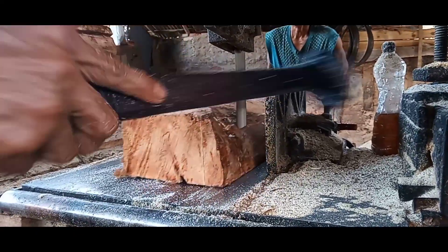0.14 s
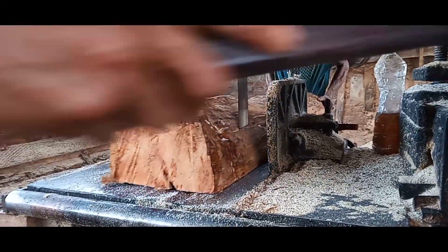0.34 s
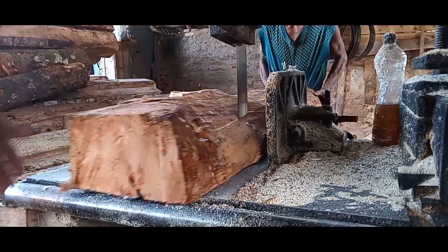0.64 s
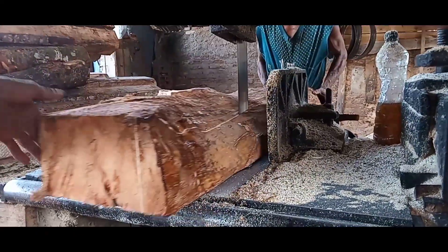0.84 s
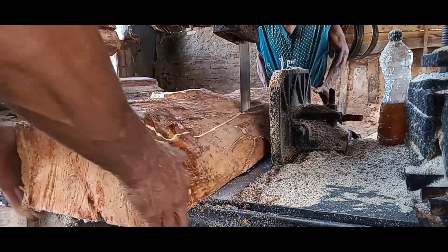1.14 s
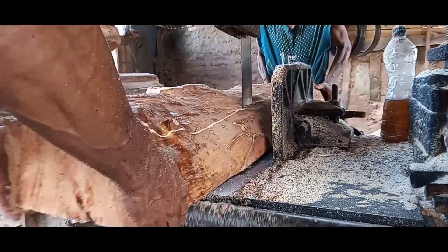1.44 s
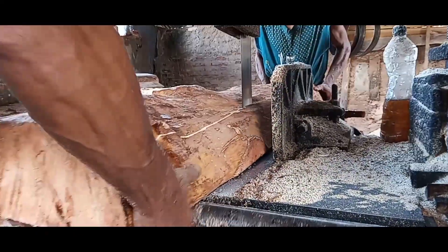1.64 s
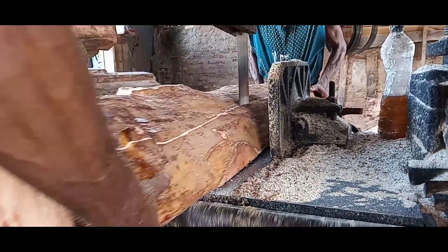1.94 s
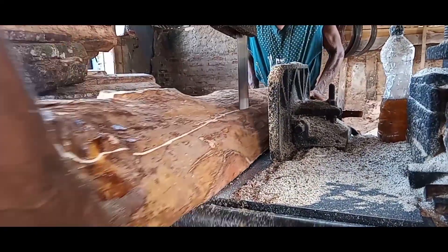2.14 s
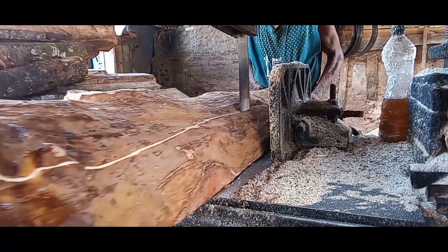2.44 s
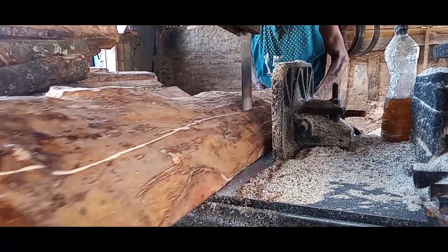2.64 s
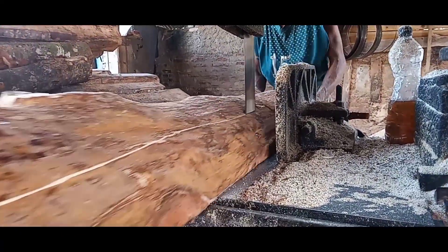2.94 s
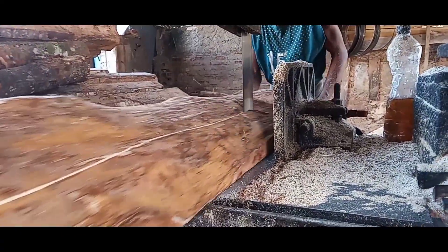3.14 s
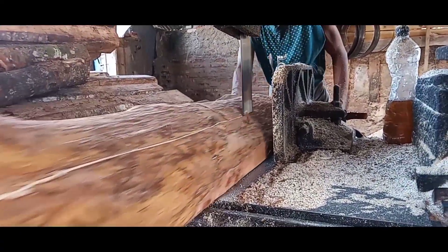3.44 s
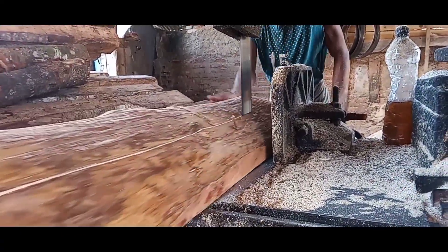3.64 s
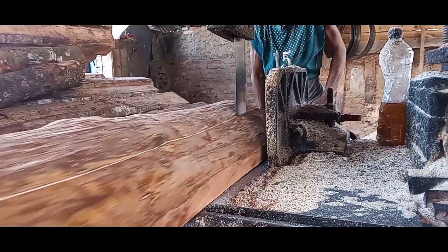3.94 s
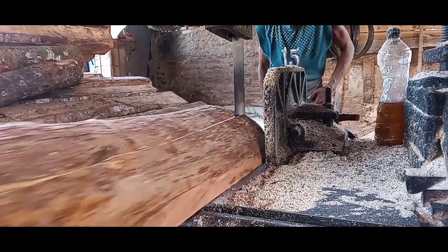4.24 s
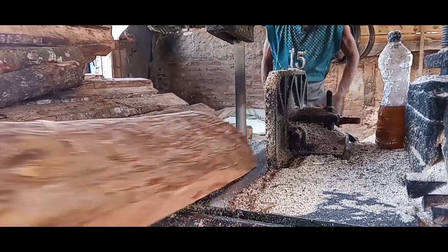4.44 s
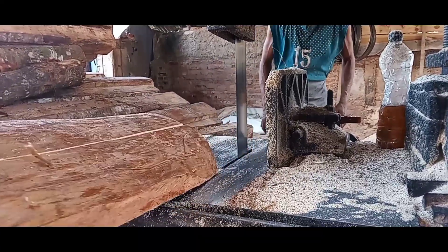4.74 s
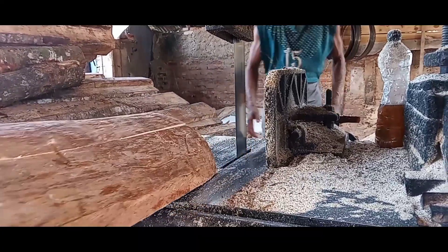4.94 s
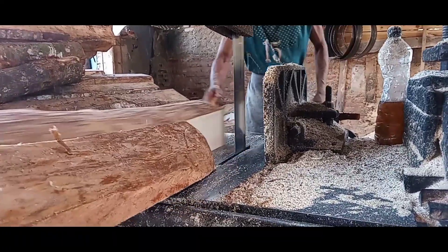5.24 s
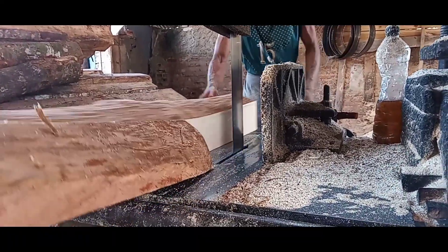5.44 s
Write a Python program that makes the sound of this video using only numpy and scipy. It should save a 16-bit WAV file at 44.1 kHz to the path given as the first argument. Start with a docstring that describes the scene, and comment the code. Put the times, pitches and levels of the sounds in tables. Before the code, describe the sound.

Steady broadband machine noise, harsh and airy, from a blade near a small stereo microphone. Wheels and motor rumble underneath while the steel sings in brief unsteady chirps, scattered left and right. A louder burst comes shortly after one second, the middle is steadier with gritty tooth hiss, and from about 4.3 seconds the freed blade roars brighter and louder to the end, without stopping.

```python
"""A rough, hissing roar with short metallic squeals and a sizzle at the very top: a large band saw in a log,
heard from close by on two small microphone ports. Broad noise makes the roar and hiss, resonated noise
the ringing blade, brief wavering tones its singing free spans, and grainy noise the teeth in the wood.
Motor and wheels rumble below. When the cut ends the sizzle drops and the rest swells."""
import sys
import numpy as np
from scipy import signal
from scipy.fft import rfft, irfft, next_fast_len
from scipy.io import wavfile

SR = 44100
rng = np.random.default_rng(int(sys.argv[2]) if len(sys.argv) > 2 else 0)


def output_pcm(signal):
    """Save a mono or channel-first signal as 16-bit PCM at the path in sys.argv[1].

    Samples are clipped to [-1, 1] before scaling.
    """
    pcm = np.clip(np.atleast_2d(signal).T, -1, 1) * 32767
    wavfile.write(sys.argv[1], SR, np.round(pcm).astype(np.int16))


N = 246959
HZ = np.arange(N // 2 + 1) * SR / N + 1e-3   # spectrum bins, kept above 0 for the logarithm
CUTOFF_HZ = 15480   # top of the sound

# blade and frame resonances, always faintly excited:
# (frequency [Hz], width [Hz], level before swell and flicker [dB], left-right difference [dB])
RESONANCES = [(980.5, 34, -54, -5.5), (1065, 29, -59.5, 12), (1135, 12, -59, -0.5), (1277, 16, -65, -11),
              (1720, 9.3, -59, -17), (2622, 75, -48, 1), (2976, 110, -53.5, 6), (3398, 45, -53, 20),
              (3640, 240, -50.5, -12), (4207, 100, -53.5, 3), (5094, 35, -49.5, 7), (5204, 130, -54.5, 8),
              (5950, 120, -86, -20)]


def from_db(db):
    """Turn dB into gain."""
    return 10 ** (np.asarray(db) / 20)


def rms_one(x):
    """Scale to rms 1."""
    return x / np.sqrt(np.mean(x ** 2) + 1e-20)


def at_hz(points, hz):
    """Read a spectrum curve on a log-frequency axis."""
    point_hz, value = np.array(points).T
    return np.interp(np.log(hz), np.log(point_hz), value)


def in_time(rows):
    """Read the columns of a time curve at every sample."""
    s, *columns = np.transpose(rows)
    return [np.interp(np.arange(N) / SR, s, c) for c in columns]


def sides(pan_db):
    """Left and right gains of a left-right difference, mean power 1."""
    pair = from_db(np.array([[pan_db / 2], [-pan_db / 2]]))
    return rms_one(pair)


def drift(rate_hz):
    """Slow random curve of spread 1: noise through a double one-pole low-pass, run in."""
    r = np.exp(-80 * np.pi * rate_hz / SR)   # one step every 40 samples
    noise = rng.standard_normal(N // 40 + 2002)
    slow = signal.lfilter([1], [1, -2 * r, r * r], noise)[2000:]
    return np.interp(np.arange(N) / 40, np.arange(len(slow)), rms_one(slow))


def stereo_noise():
    """Spectrum of unit white noise for both ports, alike in the bass and nearly unrelated at the top."""
    # how alike the two ports are: (frequency [Hz], likeness [0 to 1])
    likeness = [(40, 0.86), (200, 0.86), (450, 0.52), (700, 0.39), (1000, 0.0048), (2500, 0.16),
                (3500, 0.016), (15000, 0.012)]
    mid, side = rfft(rng.standard_normal((2, N)))
    alike = np.clip(at_hz(likeness, HZ), 0, 1)
    return np.sqrt((1 + alike) / 2) * mid + np.sqrt((1 - alike) / 2) * side * [[1], [-1]]


def resonate(x, hz, width_hz):
    """Pass noise twice through one resonance, which leaves a wavering tone of rms 1."""
    r = np.exp(-np.pi * width_hz / np.sqrt(np.sqrt(2) - 1) / SR)   # each pass is wider than the pair
    for _ in range(2):
        x = signal.lfilter([1, 0, -1], [1, -2 * r * np.cos(2 * np.pi * hz / SR), r * r], x)
    return rms_one(x)


def waver(size, hz, width_hz):
    """A complex tone of wandering pitch whose height is steadier than that of noise."""
    tone = signal.hilbert(resonate(rng.standard_normal(size), hz, width_hz))
    return tone / np.abs(tone) ** .6


def add(out, s, length, hz, level_db, pan_db):
    """Add one wavering tone that swells and fades, a quarter cycle apart at the two ports."""
    width_hz = 42
    start = int(s * SR)
    size = min(int(length * SR), SR // 4 + SR // 8)
    tone = waver(SR // 2, hz, width_hz)[-size:]   # skips the filter's run-in
    tone = tone * signal.windows.tukey(size, .6)
    pair = from_db(level_db) * sides(pan_db) * [tone.real, tone.imag]
    out[:, start:start + size] += pair[:, :N - start]


def running_saw(swells_db, shared_db, own_db, rasp_db):
    """Broad noise in overlapping bands; each follows its layer's swell, throbs with all and flickers alone."""
    # colour of the running saw at each port, before the swells: (frequency [Hz], density [dB per Hz])
    left_colour = [(30, -86), (110, -70), (310, -72), (420, -77), (1000, -72), (1450, -76), (1900, -75.5),
                   (2350, -70), (4600, -71.5), (5600, -69), (7150, -57), (7900, -71.5), (9500, -80),
                   (11200, -85), (13900, -87)]
    right_colour = [(30, -85), (110, -70.5), (310, -72), (420, -77), (1000, -72.5), (1450, -76),
                    (1900, -75.5), (2350, -71), (4600, -73.5), (5900, -72), (8200, -79), (9700, -70.6),
                    (11700, -72), (12900, -83), (13900, -87)]
    # where rumble, roar, hiss and air hiss each rule: frequency [Hz]
    layer_hz = [200, 1500, 6800, 10500]
    colour = from_db([at_hz(left_colour, HZ), at_hz(right_colour, HZ)]) * np.sqrt(SR / 2)
    spectrum, out = colour * stereo_noise(), 0
    throb = shared_db * drift(17.0) + rasp_db * drift(30.0)   # wheel wobble and uneven teeth
    centres = np.geomspace(40, 15000, 36)
    place = np.interp(np.log(HZ), np.log(centres), np.arange(36))
    for k, hz in enumerate(centres):
        share = np.clip(1 - np.abs(place - k), 0, 1)   # triangular band
        layer = np.interp(np.log(hz), np.log(layer_hz), np.arange(4))
        swell = sum(max(0, 1 - abs(layer - j)) * s for j, s in enumerate(swells_db))
        # the flicker differs between the ports and shrinks towards the bass
        flicker = min(1, hz / 1000) * np.array([drift(9.9), drift(14.0)])
        band = irfft(spectrum * share, N)
        out = out + from_db(swell + throb + own_db * flicker) * band
    return out


def squeals():
    """A free span of the blade catches and sings briefly: a short wavering tone each time."""
    # the clearest squeals of the blade:
    # (start [s], length [s], pitch [Hz], level [dB], left-right difference [dB])
    squeal_rows = [(0.0, 0.08, 1250, -43.5, 14), (0.048, 0.26, 2602, -35.5, -3),
                   (0.219, 0.22, 998, -43, -11), (0.491, 0.078, 1270, -42, 28), (0.5, 0.072, 3660, -39, -4),
                   (0.64, 0.08, 3410, -35.5, -26), (0.66, 0.092, 5140, -38, 4),
                   (0.988, 0.065, 5038, -43, 13), (1.062, 0.07, 3440, -32.5, -1),
                   (1.093, 0.11, 3640, -34, -6), (1.154, 0.16, 1583, -37, 5), (1.204, 0.045, 2515, -31, 5),
                   (1.251, 0.11, 1093, -37, 10.5), (1.307, 0.043, 2190, -29, 15),
                   (1.369, 0.062, 5030, -38, 13.1), (1.429, 0.039, 3740, -34, 0),
                   (1.484, 0.064, 2630, -38, 0), (1.506, 0.068, 1747, -39.5, 15),
                   (1.925, 0.16, 2640, -40, 18), (2.012, 0.055, 3480, -35.5, -15),
                   (2.055, 0.22, 5050, -38.5, 3), (2.077, 0.08, 1753, -38.5, 5),
                   (2.371, 0.092, 5080, -37, 25), (2.467, 0.045, 5962, -33, 5),
                   (2.584, 0.068, 980, -35, 15), (2.614, 0.058, 2620, -34, 1.3),
                   (2.762, 0.063, 3637, -38, -11), (2.788, 0.063, 2610, -36.5, -7),
                   (2.985, 0.093, 5900, -36, 19), (3.088, 0.086, 5090, -32.5, -0.8),
                   (3.189, 0.13, 2655, -40.5, -7), (3.206, 0.14, 5140, -36, -27),
                   (3.249, 0.069, 5967, -34, 12), (3.252, 0.19, 977, -39.5, -2),
                   (3.41, 0.16, 1250, -48, 23), (3.524, 0.095, 5100, -43, 13.5),
                   (3.69, 0.14, 1284, -41, -31), (3.81, 0.24, 1720, -38, -28), (3.852, 0.11, 5020, -36, 14),
                   (4.012, 0.081, 5000, -42, 14), (4.262, 0.06, 1960, -37, 12),
                   (4.366, 0.06, 1250, -35.5, 11), (4.429, 0.28, 5030, -31, 33),
                   (4.467, 0.14, 3620, -37, -13), (4.609, 0.056, 3620, -34, -14),
                   (4.761, 0.086, 2610, -27.5, 3), (4.781, 0.19, 4970, -33, 12.9),
                   (5.04, 0.055, 5060, -32, 10), (5.233, 0.087, 5060, -33, 29),
                   (5.302, 0.094, 1073, -33.5, -5), (5.376, 0.14, 982, -36, 0),
                   (5.46, 0.077, 5000, -39, 21)]
    out = np.zeros((2, N))
    for row in squeal_rows:
        add(out, *row)
    return out


def blade_modes(swell_db, flicker_db):
    """Each resonance rings on noise and breaks up into spurts, partly on its own at each port."""
    out, white = 0, [irfft(stereo_noise(), N) for _ in range(2)]
    for k, (hz, width_hz, level_db, pan_db) in enumerate(RESONANCES):
        spurts = drift(11.0) + np.array([drift(11.0), drift(11.0)])
        ring = resonate(white[k % 2], hz, width_hz)
        out = out + from_db(level_db + flicker_db * spurts) * sides(pan_db) * ring
    return from_db(swell_db) * out


def chirrups(swell_db, level_db, count):
    """Many fainter catches at chance moments, each near a blade resonance, roughen the roar."""
    spread = .04   # largest detuning, as a share of the resonance frequency
    out = np.zeros((2, N))
    for when, long, which, off, loud, pan in rng.random((count, 6)):
        row = int(len(RESONANCES) * np.sqrt(which))   # favours the later rows
        hz = RESONANCES[row][0] * (1 + spread * (2 * off - 1))
        add(out, when * N / SR, .03 + .04 * long, hz, level_db + 10.0 * loud, 24 * (pan - .5))
    return from_db(swell_db) * out


def teeth(level_db, grain_db):
    """Teeth tearing fibres: noise at the very top in fine uneven grains, partly shared by the ports."""
    # colour of the sizzle at each port: (frequency [Hz], relative level [dB])
    left_sizzle = [(13900, -30), (14300, -11), (14900, -5), (15420, 0)]
    right_sizzle = [(13900, -30), (14250, -14), (14900, -13), (15420, -10)]
    grains = from_db(grain_db * (drift(130.0) + .4 * drift(20.0)))
    near, own = rng.standard_normal(N), rng.standard_normal((2, N))
    colour = from_db([at_hz(left_sizzle, HZ), at_hz(right_sizzle, HZ)])
    colour = colour * (HZ > left_sizzle[0][0]) * (HZ < CUTOFF_HZ)
    sizzle = irfft(rfft(grains * (.9 * near + own)) * colour, N)
    return from_db(level_db) * rms_one(sizzle)


def motor(swell_db):
    """The loaded motor drones: one low wavering tone, alike at both ports."""
    hum_hz, width_hz, level_db = 206, 41, -52   # level before the swell
    hum = waver(next_fast_len(N), hum_hz, width_hz)[:N].real
    return from_db(level_db + swell_db) * rms_one(hum)


def scene():
    """Mix all parts of the saw; rumble and air hiss follow the blade and the bite."""
    # level of the blade's roar, used as swell about its mean: (time [s], level [dB])
    roar_curve = [(0.0, -37.5), (0.11, -39.5), (0.12, -35.5), (0.61, -42), (0.65, -39), (1.01, -40),
                  (1.14, -30.5), (1.51, -33.5), (1.56, -37), (2.54, -39.5), (2.65, -32.5), (2.7, -39.5),
                  (2.82, -35), (2.85, -40), (3.23, -38), (3.66, -40.5), (3.7, -37.5), (4.27, -38),
                  (4.29, -32.5), (4.41, -30), (5.54, -35), (5.6, -34.5)]
    # level of the blade's hiss, used as swell about its mean: (time [s], level [dB])
    hiss_curve = [(0.0, -38), (0.03, -36), (0.08, -35), (0.39, -37), (0.48, -40.5), (0.51, -37),
                  (0.89, -36.5), (1.36, -30.5), (1.53, -34), (2.54, -36), (2.57, -34), (2.92, -37.5),
                  (3.12, -35), (4.09, -37.5), (4.18, -33), (4.26, -38), (4.31, -30.5), (5.6, -29)]
    # bite of the teeth in the wood, heard as the sizzle: (time [s], level [dB])
    bite_curve = [(0.0, -39), (0.09, -39), (0.9, -37.5), (1.23, -43), (2.2, -37), (3.46, -37), (3.52, -38),
                  (3.57, -40), (3.65, -35), (4.2, -37.5), (4.26, -34), (4.27, -48), (4.32, -38),
                  (4.37, -45.5), (5.58, -46.5), (5.6, -52)]
    wheel_hz, wheel_throb_db = 16.0, 0.5   # the rumble beats with the wheel
    teeth_db, = in_time(bite_curve)
    curves = in_time(roar_curve) + in_time(hiss_curve) + [teeth_db]
    roar, hiss, bite = [c - c.mean() for c in curves]
    # how far one layer follows another, in dB per dB
    rumble = 0.37 * roar + 0.43 * hiss
    air = 0.51 * hiss + 0.26 * bite
    catches = 0.45 * roar
    rumble = rumble + wheel_throb_db * np.sin(2 * np.pi * wheel_hz * np.arange(N) / SR)
    broad = running_saw([rumble, roar, hiss, air], shared_db=0.1, own_db=0.81, rasp_db=0.94)
    blade = squeals() + blade_modes(roar, flicker_db=3.0)
    blade = blade + chirrups(catches, level_db=-47.5, count=240)
    sizzle = teeth(teeth_db, grain_db=2.8)
    return broad + blade + sizzle + motor(rumble)


def record(dry):
    """Cut the top steeply with an elliptic low-pass."""
    return signal.sosfilt(signal.ellip(14, .3, 75, CUTOFF_HZ, fs=SR, output="sos"), dry)


dry = scene()
out = record(dry)
output_pcm(out)
```